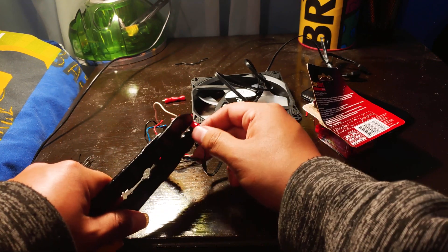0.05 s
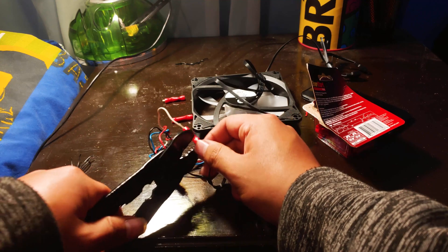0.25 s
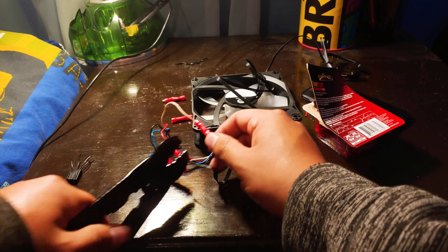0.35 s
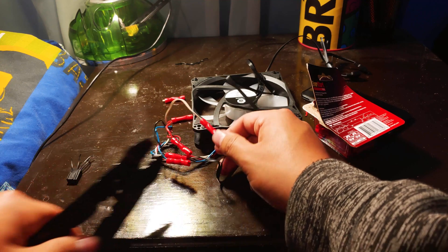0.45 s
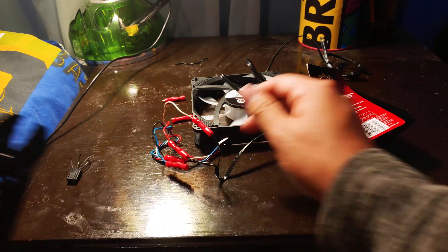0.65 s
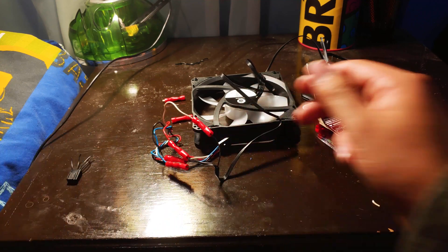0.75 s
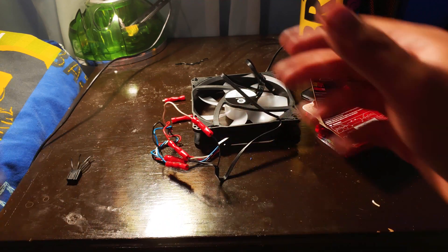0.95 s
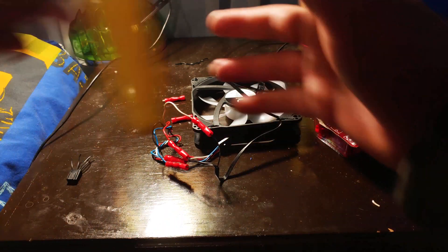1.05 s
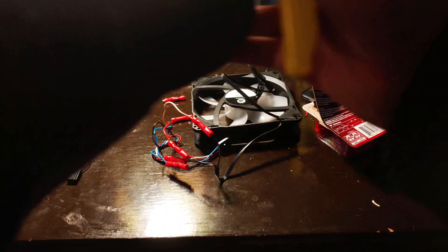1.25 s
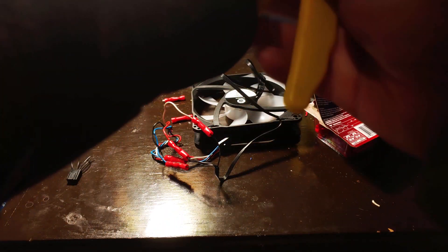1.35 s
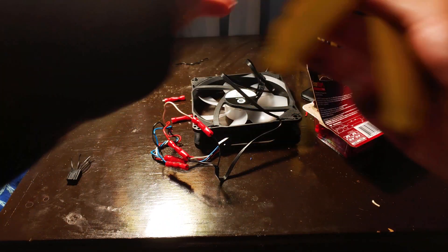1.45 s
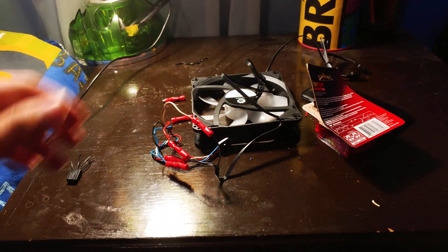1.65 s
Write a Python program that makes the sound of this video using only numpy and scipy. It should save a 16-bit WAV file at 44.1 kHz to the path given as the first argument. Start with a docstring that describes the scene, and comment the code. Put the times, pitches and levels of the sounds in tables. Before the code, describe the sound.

A crimping tool scrapes softly on a hollow wooden desk for the first 0.1 seconds, then knocks it loudly at about 0.2, with a short woody ring. Faint steel ticks and soft handling bumps follow from 0.4 to 0.7. After near quiet, a very brief hiss leads into a crisp, bright latch snap at 1.25, then faint rustles and bumps to 1.7. Low mains hum and rumble lie beneath, in a small room, closely miked.

```python
"""A crimping tool knocks and scrapes the top of a hollow wooden desk in a small quiet room: soft clicks
and random grains of force ring the modes of the desk top, and a noise tail follows the loudest knock.
Steel parts of the tool tick, and later a thin hiss swells into a bright latch snap, made of noise bursts
that ring short modes. Soft grainy swells are bands of noise, low bumps are single decaying sines.
Mains hum, low rumble and faint room noise lie underneath."""
import sys
import numpy as np
from scipy import signal
from scipy.io import wavfile
from scipy.ndimage import uniform_filter1d, minimum_filter1d

SR = 44100
rng = np.random.default_rng(int(sys.argv[2]) if len(sys.argv) > 2 else 0)


def transcribe(signal):
    """Save signal, clipped to [-1, 1], as a 16-bit WAV file at the path in sys.argv[1]."""
    frames = np.atleast_2d(signal).T
    limited = np.clip(frames, -1, 1)
    pcm = np.round(limited * 32767).astype(np.int16)
    wavfile.write(sys.argv[1], SR, pcm)


def boost_factor(decibels):
    """Convert a level in decibels to a linear amplitude factor."""
    exponent = np.asarray(decibels, float) / 20
    return 10 ** exponent


N = 74970
TIME_S = np.arange(N) / SR

# knocks on the desk top: (time [s], click level before low-pass [dB], contact low-pass [Hz])
KNOCKS = [(0.2128, -29, 2094), (.2215, -2.16, 1732), (0.599, -56.5, 1810), (.706, -55.5, 1490)]
# desk top modes: (frequency [Hz], level [dB], t60 [s], left minus right [dB], direction [only the sign counts])
DESK_MODES = [(139, -17.5, 0.062, 5.5, -1), (189.2, -24.5, .25, 7.5, 2.5), (235.6, -20, 0.24, 4, -1),
              (285.3, -6, .22, 3, -1), (334, -5, 0.16, 1.5, 3), (338.6, -33.5, .8, -1, 1),
              (401, -2, 0.028, -1.5, -2.5), (453, -24.5, 0.31, 2.5, -1), (540.8, -17.5, .13, -2, -1),
              (626.5, -19, .2, -7.5, -1), (666, -13.5, .1, -5.5, -1), (741, -9.5, 0.08, -4.5, -0.5),
              (805, -5, 0.017, 5.5, 1), (1127, -10, 0.033, 2.5, -1), (1268.4, -15, .1, -8, 1),
              (1406.3, -4, 0.037, 4, -1), (1603, -16, 0.036, -2, 1)]
# steel ticks of the tool: (time [s], click level before low-pass [dB], contact low-pass [Hz])
TICKS = [(.0095, -66, 12000), (0.4306, -63, 6500), (0.5094, -48.5, 12000), (0.516, -54, 5000),
         (.632, -77.5, 8000), (1.683, -74.5, 6000)]
# latch snap and its bounces: (time [s], level [dB], length [s])
SNAPS = [(1.2470, -14.5, 0.0023), (1.25, -44.5, 0.0016), (1.2535, -21, 0.0031), (1.255, -28, 0.0013),
         (1.2582, -31.5, 0.0014), (1.2602, -41.5, 0.0069)]


def rms_one(x):
    """Scales to rms 1."""
    return x / np.sqrt(np.mean(x ** 2) + 1e-20)


def in_time(rows):
    """Straight lines through (time [s], value) over the whole scene."""
    s, value = np.transpose(rows)
    return np.interp(TIME_S, s, value)


def at_hz(rows, hz):
    """Value at hz from (frequency [Hz], value), linear in log frequency."""
    row_hz, value = np.transpose(rows)
    return np.interp(np.log(hz), np.log(np.maximum(row_hz, 1)), value)


def left_right(pan_db):
    """Gains of the two channels, left pan_db above right."""
    return boost_factor(np.array([[.5], [-.5]]) * pan_db)


def band_pass(x, order, low_hz, high_hz):
    """Butterworth band-pass."""
    sos = signal.butter(order, [low_hz, high_hz], "band", fs=SR, output="sos")
    return signal.sosfilt(sos, x)


def soften(force, hz):
    """Steep low-pass: a soft contact."""
    return signal.sosfilt(signal.butter(7, min(hz, .45 * SR), fs=SR, output="sos"), force)


def click(s, db):
    """One-sample impulse."""
    out = np.zeros(N)
    out[int(s * SR)] = boost_factor(db)
    return out


def soft_clicks(rows):
    """One low-passed impulse per row (time [s], level [dB], low-pass [Hz])."""
    return np.array([soften(click(s, db) + 1e-18, hz) for s, db, hz in rows])  # offset avoids denormals


def burst(s, db, length_s):
    """Scratchy contact: noise under a smooth hump, expected energy that of a click of the same level."""
    hump = np.sin(np.pi * np.clip((TIME_S - s) / length_s, 0, 1)) ** 2
    unit_energy = np.sqrt(length_s * SR * 3 / 8)
    return boost_factor(db) * hump * rng.standard_normal(N) / unit_energy


def drift(rate_hz):
    """Slow chance, spread 1: noise through a double pole at rate_hz, run at SR / 40."""
    pole = np.exp(-2 * np.pi * rate_hz * 40 / SR)
    white = rng.standard_normal(N // 40 + 2002)
    slow = signal.lfilter([1], [1, -2 * pole, pole * pole], white)[2000:]
    return np.interp(np.arange(N) / 40, np.arange(len(slow)), rms_one(slow))


def ring(force, hz, t60_s):
    """Two-pole resonator: a unit click starts a decaying sine of height 1."""
    pole, w = boost_factor(-60 / (t60_s * SR)), 2 * np.pi * hz / SR
    return signal.lfilter([0, np.sin(w)], [1, -2 * pole * np.cos(w), pole * pole], force + 1e-18)


def body(forces, modes, spread_db):
    """Every force strikes every mode at its own strength per channel; the air follows surface speed."""
    right_lag_s = .00017
    strength = boost_factor(spread_db * rng.standard_normal((len(forces), len(modes), 2)))
    out = 0
    for k, (hz, db, t60_s, pan_db, *direction) in enumerate(modes):
        moved = ring(strength[:, k].T @ forces, hz, t60_s)
        speed = np.diff(moved, prepend=0) / (2 * np.sin(np.pi * hz / SR))
        sign = np.sign(direction[0]) if direction else (-1) ** k
        out = out + sign * boost_factor(db) * left_right(pan_db) * speed
    sample = np.arange(N)
    right = np.interp(sample - right_lag_s * SR, sample, out[1])
    return np.array([out[0], right])


def bands(spectrum, shape, alike=None):
    """Narrow bands of stereo noise, rms 1 in all, each band then shaped by shape(hz)."""
    # left-right likeness used when alike is not given: (frequency [Hz], correlation)
    likeness = [(60, 0.71), (240, 1), (950, 0.1), (3770, -0.01), (15000, -0.24)]
    warm_up = 8000
    edges = 20 * 2 ** (np.arange(25) / 2.5)
    mids_hz = np.sqrt(edges[1:] * edges[:-1])
    gains = boost_factor(at_hz(spectrum, mids_hz))
    gains = gains / np.sqrt(np.sum(gains ** 2 * np.diff(edges)) * 2 / SR)
    white = rng.standard_normal((2, 2, N + warm_up))  # neighbouring bands use different noise
    out = 0
    for k, hz in enumerate(mids_hz):
        if gains[k] <= 3e-4 * gains.max():
            continue
        mid, side = band_pass(white[k % 2], 2, edges[k], edges[k + 1])[:, warm_up:]
        c = np.clip(at_hz(likeness, hz) if alike is None else alike, 0, 1)
        stereo = np.sqrt(1 + c) * mid + np.sqrt(1 - c) * side * [[1], [-1]]
        out = out + gains[k] * shape(hz) * stereo * np.sqrt(.5)
    return out


def tail(hits, spectrum, t60s, alike):
    """Grainy noise from each hit (time [s], level [dB], hold [s], top [Hz]); holds, dies band by band."""
    rise_s, above_top_db, grain_db, pan_db = .003, -16, 2, 1

    def shape(hz):
        total = 0
        for s, db, hold_s, top_hz in hits:
            decay_db = -60 * np.maximum(TIME_S - s - hold_s, 0) / at_hz(t60s, hz)
            rise = np.clip((TIME_S - s) / rise_s, 0, 1)
            total = total + boost_factor(db + decay_db + above_top_db * (hz > top_hz)) * rise
        return total

    return bands(spectrum, shape, alike) * boost_factor(grain_db * drift(120)) * left_right(pan_db)


def mains_hum():
    """Steady mains lines whose levels waver slowly."""
    # mains lines: (frequency [Hz], rms level before wavering [dB])
    lines = [(60, -65), (120, -67), (240, -73), (360, -80)]
    out = 0
    for hz, db in lines:
        sine = np.sin(2 * np.pi * (hz * TIME_S + rng.random()))
        out = out + boost_factor(db + 1.5 * drift(4)) * np.sqrt(2) * sine
    return out


def rumble():
    """Lumpy low noise: each band drifts in level by itself."""
    # rumble course: (time [s], level before the lift, drift and pan [dB])
    course = [(0.0, -57.5), (0.364, -61.5), (0.482, -57.5), (0.666, -60), (0.904, -71.5), (1.296, -62.5),
              (1.43, -61), (1.7, -71.5)]
    # rumble spectrum: (frequency [Hz], relative density [dB per Hz])
    colour = [(20, -12), (35, -7.5), (55, 3.15), (90, -8), (140, -17.5), (200, -33.5), (260, -60.5)]
    lift_db = 1.5
    noise = bands(colour, lambda hz: boost_factor(3.0 * drift(6)), alike=.3)
    return boost_factor(in_time(course) + lift_db) * noise * left_right(3)


def room_noise():
    """Faint broadband noise that swells with movement."""
    # room noise spectrum: (frequency [Hz], relative density [dB per Hz])
    colour = [(80, -24.5), (110, -4), (160, -16), (250, -14), (400, -17.5), (700, -23.5), (1200, -26.5),
              (2000, -35), (4000, -41.5), (6500, -45), (7500, -53.5), (11000, -57.5), (13000, -66),
              (16000, -70.5)]
    # swell: (time [s], gain [dB])
    swell = [(0, 5), (.4, 3), (.75, 1), (1.0, -1.2), (1.3, 7), (1.7, 2.5)]
    base_db = -69.5
    noise = bands(colour, lambda hz: boost_factor(1.5 * drift(8)))
    return boost_factor(base_db + in_time(swell)) * noise * left_right(3)


def noise_swells():
    """Soft grainy noise bands swell under Gaussian humps; the first is a low swell around the loud knock."""
    # swells: (centre [s], half length [s], peak rms before grain [dB], low edge [Hz], high edge [Hz])
    rows = [(0.215, 0.0078, -40.5, 110, 877), (0.41, .011, -70.5, 1150, 1650),
            (0.496, 0.015, -66, 1260, 2420), (0.614, .028, -76, 960, 2100), (0.648, 0.022, -64.5, 263, 567),
            (0.71, 0.016, -68, 852, 1550), (1.383, 0.0093, -60.5, 820, 1440),
            (1.409, .010, -56, 1010, 2080), (1.395, .024, -82.5, 3250, 6700),
            (1.508, 0.017, -79, 2630, 6400), (1.516, 0.037, -70, 417, 750), (1.632, 0.035, -64, 410, 815)]
    grain_db = 2.5
    out = 0
    for s, half_s, db, low_hz, high_hz in rows:
        noise = rms_one(band_pass(rng.standard_normal((2, N)), 2, low_hz, high_hz))
        hump = np.exp(-.5 * ((TIME_S - s) / half_s) ** 2)
        out = out + boost_factor(db + grain_db * drift(60)) * hump * noise
    return out


def bumps():
    """Soft bumps through the desk: a push one period long rings a single mode."""
    # bumps: (time [s], level [dB], frequency [Hz], t60 [s], left minus right [dB])
    rows = [(.202, -46.5, 72.8, 0.1, 2.5), (.705, -53, 732, 0.12, -20), (.713, -50, 192.5, 0.13, -18),
            (0.873, -49.5, 39.6, 0.2, 1), (1.233, -46, 56, 0.16, 18), (1.246, -40.5, 182.5, 0.059, 1.5),
            (1.391, -55.5, 210, 0.26, 11), (1.511, -45.5, 58.2, .11, 10.5)]
    out = 0
    for s, db, hz, t60_s, pan_db in rows:
        push = np.hanning(int(SR / hz)) * 2 * hz / SR
        force = 2 * signal.lfilter(push, 1, click(s, db))  # 2 makes up for the push's loss at hz
        out = out + ring(force, hz, t60_s) * left_right(pan_db)
    return out


def hiss_before_snap():
    """A thin hiss swells exponentially and stops at the snap."""
    # hiss: end [s], white noise level at the end, before band-pass [dB], rise time constant [s]
    hiss_row = (1.247, -58, .012)
    end_s, db, rise_s = hiss_row
    from_end_s = TIME_S - end_s
    hiss = band_pass(rng.standard_normal((2, N)), 1, 600, 11000)
    return boost_factor(db) * np.exp(np.minimum(from_end_s, 0) / rise_s) * (from_end_s < 0) * hiss


def latch_snap():
    """Scratchy bursts of contact ring the short bright modes of the latch."""
    # latch modes: (frequency [Hz], level [dB], t60 [s], left minus right [dB])
    latch_modes = [(396, -20, 0.017, 8.5), (1160, -21, 0.011, -16), (1969, -25.5, 0.11, 6),
                   (3350, -29, 0.12, 2), (2300, -15.5, .006, 24), (3050, -10, 0.011, -13.5),
                   (3744, 3.5, 0.014, -2.8), (4137, -4, 0.014, 0.7), (4300, -39, 0.15, 11),
                   (5000, -5.5, 0.0055, -4), (5510, -10.5, 0.011, 6), (6610, -5, 0.0051, 16.5),
                   (8100, -8.5, 0.0098, -1.5), (8500, -6.5, 0.0069, 15.5), (9500, -1.5, .005, 2),
                   (11000, -10, 0.0038, -10.5), (14800, -12.5, 0.0031, -8)]
    return body(np.array([burst(*row) for row in SNAPS]), latch_modes, spread_db=1.5)


def tool_ticks():
    """Clicks of steel contact ring the modes of the tool."""
    # tool modes: (frequency [Hz], level [dB], t60 [s], left minus right [dB])
    tool_modes = [(366, 1.5, 0.069, -4), (1517, -10.5, .03, 21), (2013, -1, 0.074, 16), (2220, -4, .04, 2),
                  (2680, -6.5, 0.074, 13.5), (3270, -5, .13, 4), (3300, -3, 0.026, 6),
                  (4170, -15, 0.065, 13), (4520, -15.5, 0.046, -10.5), (5380, -11.5, 0.022, 17),
                  (5930, -0.5, 0.016, 5.5), (6910, -8.5, 0.033, 9)]
    return body(soft_clicks(TICKS), tool_modes, spread_db=2.5)


def steel_tail():
    """Bright noise of room and small loose parts, dying after the first snap and every tick."""
    # tail spectrum: (frequency [Hz], relative density [dB per Hz])
    spectrum = [(300, -6.5), (1000, -17.5), (1930, -8), (2400, -35), (3060, -3.5), (4300, -10),
                (5500, -18.5), (6600, -22.5), (8500, -14), (11000, -41), (12500, -47)]
    # tail decay: (frequency [Hz], t60 [s])
    t60s = [(500, 0.0877), (2000, 0.21), (4000, 0.13), (6500, 0.66), (9000, 0.11), (12000, 0.115)]
    hits = [(SNAPS[0][0], -45, .026, SR)]
    hits += [(s, db - 15.5, 0, 7200) for s, db, _ in TICKS]  # ticks are weak above 7200 Hz
    return tail(hits, spectrum, t60s, alike=0.13)


def desk_drag():
    """Tool dragged on the desk: random grains of force ring shortened desk modes."""
    # drag course: (time [s], level [dB])
    course = [(0, -47.5), (.02, -57), (.035, -55), (.06, -49.5), (.095, -55), (.12, -78), (.15, -83)]
    grains_per_s, contact_hz, longest_t60_s = 560, 1330, .06
    grains = (rng.random(N) < grains_per_s / SR) * rng.standard_normal(N)
    damped = [(hz, db, min(t60_s, longest_t60_s), pan_db, direction)
              for hz, db, t60_s, pan_db, direction in DESK_MODES]
    scrape = rms_one(body(soften(grains, contact_hz)[None], damped, spread_db=0))
    return boost_factor(in_time(course)) * (TIME_S < course[-1][0]) * scrape


def desk_knocks():
    """Soft clicks ring the desk top; noise of room and loose parts dies after the second, loudest knock."""
    # tail spectrum: (frequency [Hz], relative density [dB per Hz])
    spectrum = [(24, -25.5), (50, -15.5), (100, -11), (160, -21), (300, -11), (450, -16), (650, -11.5),
                (1000, -21), (1500, -21.5), (2000, -34), (4000, -33.5), (6900, -45), (7400, -55.5),
                (12000, -68), (14000, -95)]
    # tail decay: (frequency [Hz], t60 [s])
    t60s = [(40, .7), (150, 0.41), (330, 0.46), (700, .25), (1500, 0.18), (3000, .18), (6000, 0.082),
            (12000, .15)]
    knocks = body(soft_clicks(KNOCKS), DESK_MODES, spread_db=1.0)
    hits = [(KNOCKS[1][0], -27.5, .025, SR)]
    return knocks + tail(hits, spectrum, t60s, alike=0.61)


def scene():
    """Sum of all layers, stereo."""
    background = mains_hum() + rumble() + room_noise()
    soft_layers = noise_swells() + bumps() + hiss_before_snap()
    steel = latch_snap() + tool_ticks() + steel_tail()
    return background + soft_layers + steel + desk_drag() + desk_knocks()


def left_port(x):
    """Resonance of the left microphone port, added to the direct sound."""
    hz, width_hz, gain = 6530, 250, 2.2
    pole, w = np.exp(-np.pi * width_hz / SR), 2 * np.pi * hz / SR
    peak = (1 - pole * pole) / 2
    return x + gain * signal.lfilter([peak, 0, -peak], [1, -2 * pole * np.cos(w), pole * pole], x)


def limiter(x):
    """Look-ahead gain dip, shared by both channels, that keeps peaks under full scale."""
    peak, smooth_s = .98, .004
    span = int(smooth_s * SR)
    need = np.minimum(1, peak / (np.abs(x).max(axis=0) + 1e-9))
    return x * uniform_filter1d(minimum_filter1d(need, size=2 * span), size=span)


def low_pass(x):
    """Removes everything above the highest recorded frequency."""
    return signal.sosfilt(signal.butter(12, 16330, fs=SR, output="sos"), x)


def record(dry):
    """Left port resonance, treble roll-off at 12 kHz, limiter."""
    roll_off = signal.butter(8, 12000, fs=SR, output="sos")
    mic = signal.sosfilt(roll_off, [left_port(dry[0]), dry[1]])
    mix = limiter(mic)
    return low_pass(mix)


dry = scene()
out = record(dry)
transcribe(out)
```